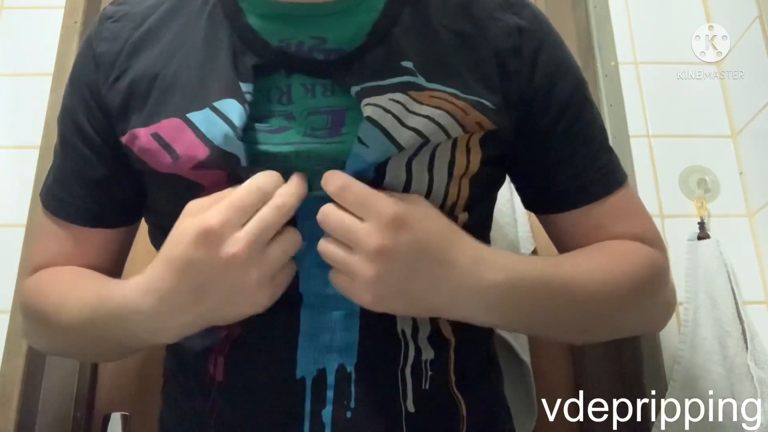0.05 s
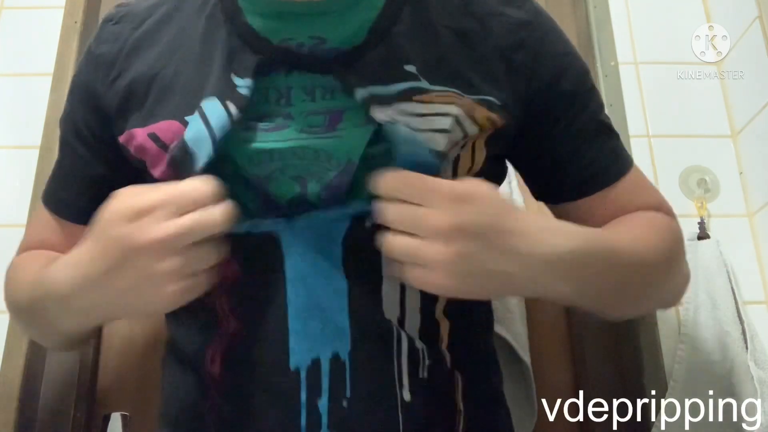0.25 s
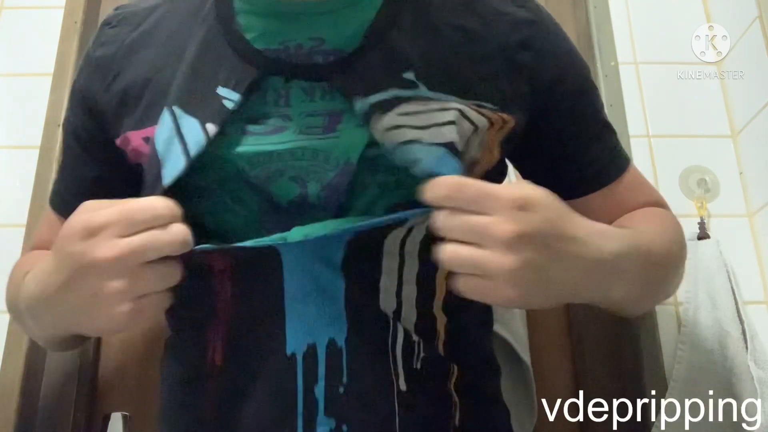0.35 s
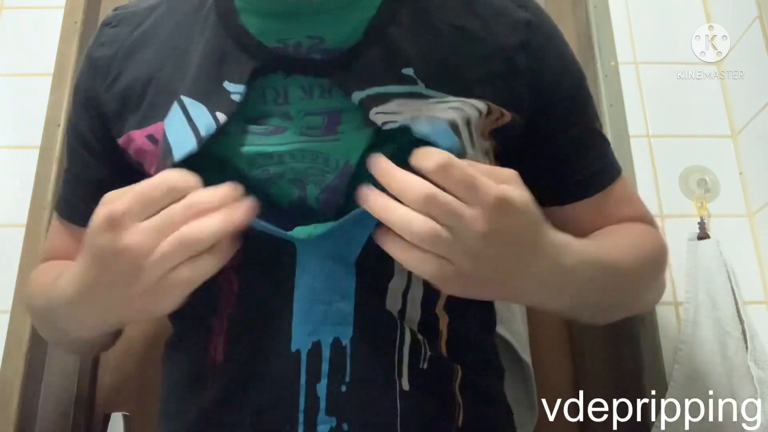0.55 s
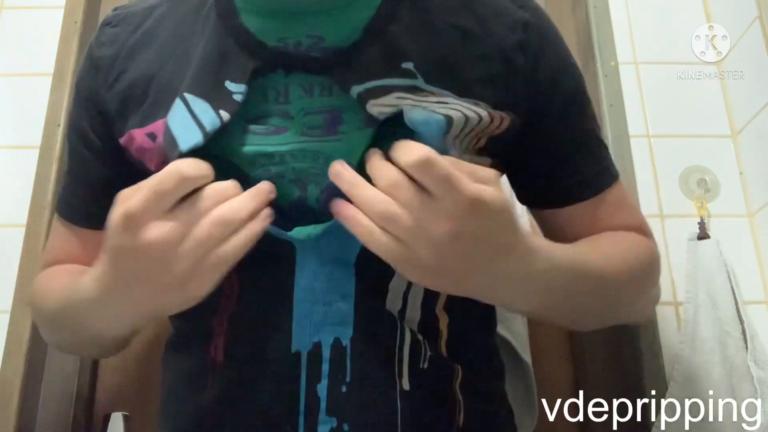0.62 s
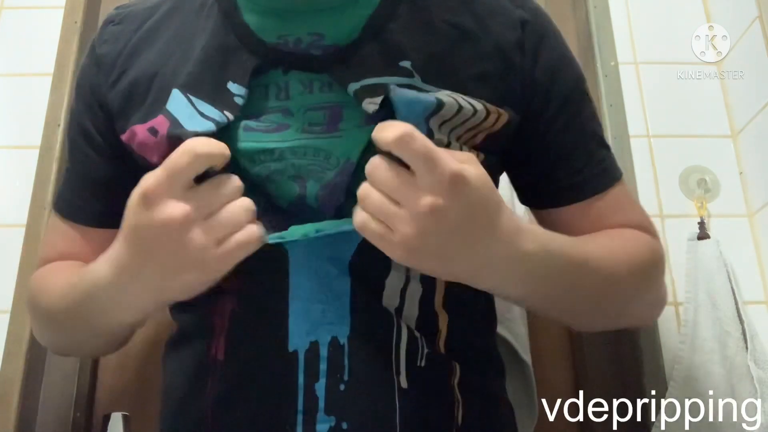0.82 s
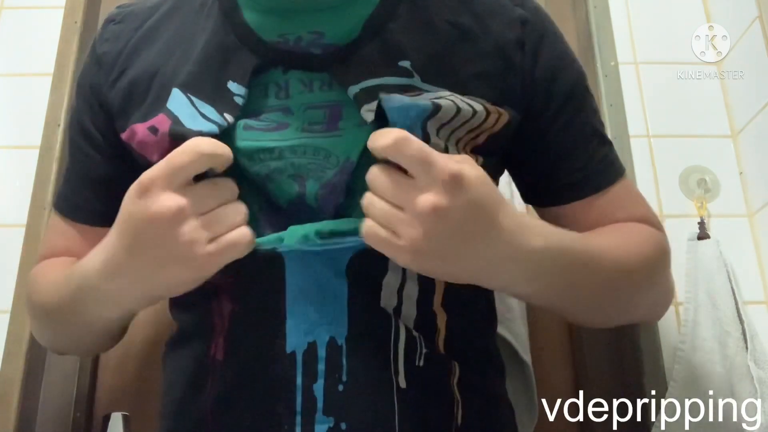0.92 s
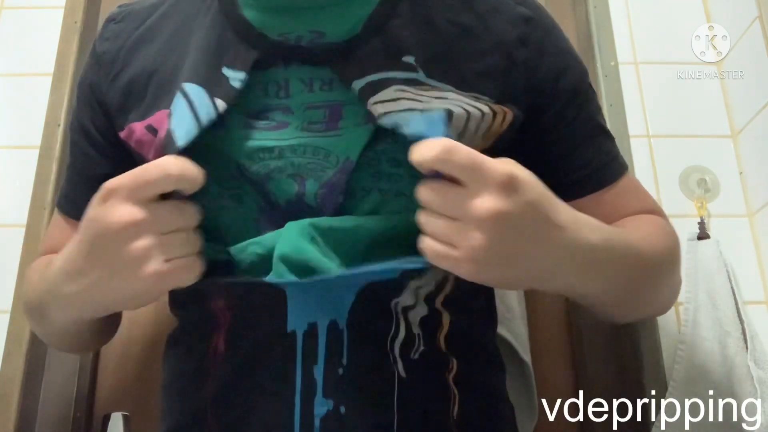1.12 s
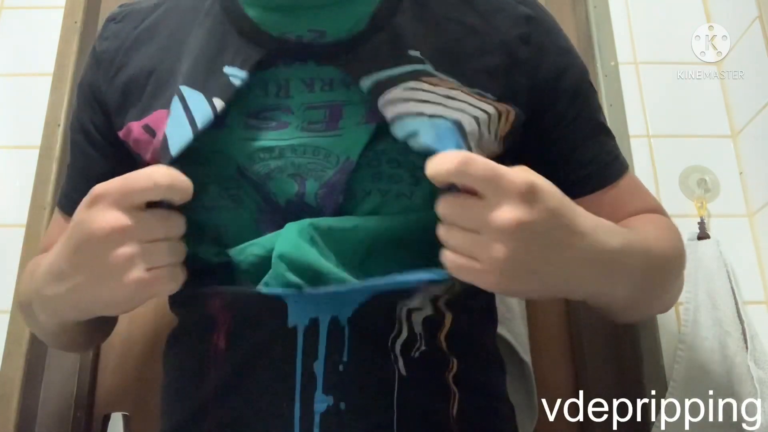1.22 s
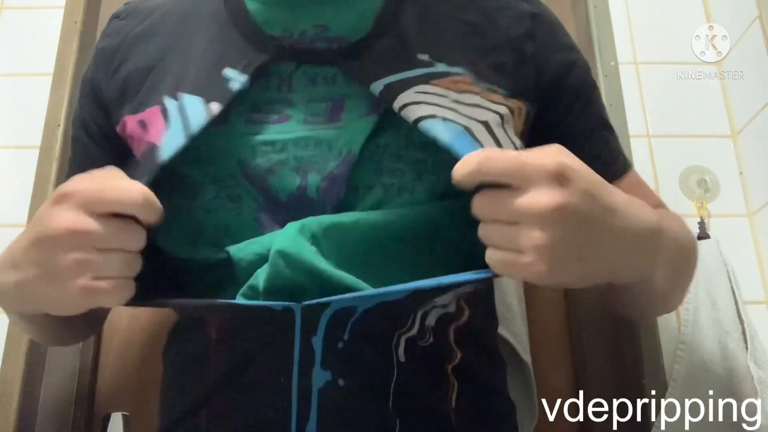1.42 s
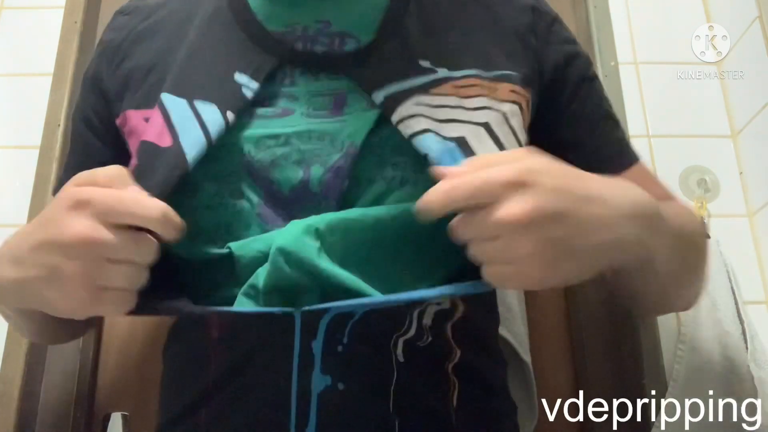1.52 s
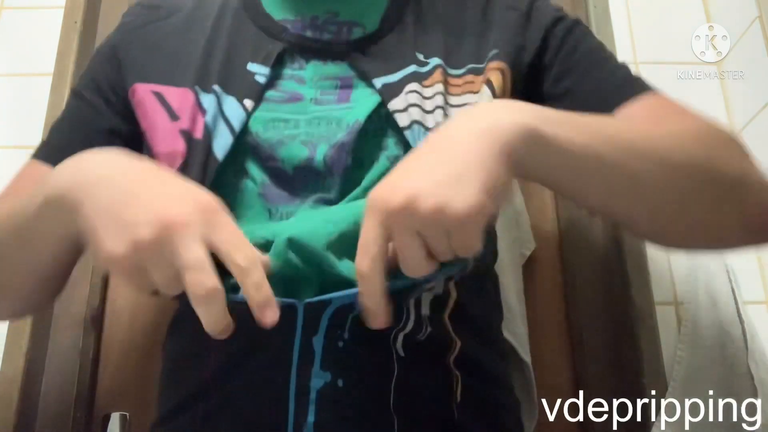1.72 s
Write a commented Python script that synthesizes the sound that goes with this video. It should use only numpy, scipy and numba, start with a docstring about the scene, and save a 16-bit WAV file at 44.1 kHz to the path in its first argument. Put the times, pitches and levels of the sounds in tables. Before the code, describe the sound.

A cotton shirt tears close to the microphone, with a harsh crackling rip from about 0.2 to 0.45 seconds. After a short lull, single threads snap around 1 second. Two more rips follow back to back, from 1.05 to 1.25 and from 1.3 to 1.5 seconds. The loose cloth then softly rustles and flaps until about 1.75 seconds. A small tiled room adds brief echo and a faint low hum.

```python
"""A small tiled room, a phone's two microphones close to a cotton shirt torn open by hand in three pulls.
Rows of stitches give way in quick uneven snaps, each with a spray of breaking fibres; the snaps ring
the taut cloth and, as the tear widens, shake the loose panels. The cloth rustles and flaps afterwards.
Chest, arms and tiles throw the sound back; behind it lie a low hum and faint room tone."""
import sys
import numpy as np
from scipy import signal
from scipy.fft import rfft, irfft
from scipy.io import wavfile
from scipy.ndimage import uniform_filter1d
from numba import njit

SR = 44100
rng = np.random.default_rng(int(sys.argv[2]) if len(sys.argv) > 2 else 0)


def wav_record(signal):
    """Record a signal, one row per channel, as 16-bit PCM in the file named by sys.argv[1]."""
    frames = np.transpose(np.atleast_2d(signal))
    bounded = np.clip(frames, -1, 1)
    # unit amplitude maps onto the largest positive 16-bit level
    quanta = np.round(bounded * 32767).astype(np.int16)
    wavfile.write(sys.argv[1], SR, quanta)


N = 77175

# course of each pull (time [s], snaps [dB], taut cloth [dB], loose panels [dB])
PULL_1 = [(.236, -36, -40, -65), (.26, -38, -38, -57.5), (0.287, -38, -36.5, -53), (0.298, -37.5, -40, -46),
          (.32, -36.5, -37, -48), (.35, -35.5, -34, -43), (0.371, -35.5, -30, -37.5),
          (0.387, -37, -38, -40), (0.409, -39, -28.5, -44.5), (.418, -37, -38.5, -45),
          (.428, -44, -32, -44.5), (0.439, -38, -41, -46.5)]
PULL_2 = [(1.046, -40.5, -46, -56), (1.07, -38, -44.5, -57), (1.105, -37.5, -43.5, -47),
          (1.145, -38.5, -43, -43), (1.195, -36.5, -48.5, -45), (1.228, -38.5, -40, -41),
          (1.249, -38.5, -38.5, -48), (1.259, -40.5, -43.5, -51)]
PULL_3 = [(1.292, -35, -38.5, -42), (1.305, -39.5, -39, -37), (1.335, -37, -45, -45.5),
          (1.362, -34, -39, -43), (1.41, -37, -37.5, -43.5), (1.458, -38, -41, -46)]
# taut cloth's resonances in each pull (frequency [Hz], width [Hz], level [dB])
TAUT_MODES_1 = [(678.5, 160, -5), (950, 50, 2.5), (1047, 120, -3.5), (1550, 170, -12.5), (2150, 640, -8.5)]
TAUT_MODES_2 = [(634, 100, -2.5), (964, 62, -1), (1074, 81, 1.5), (1480, 410, -13.5), (2126, 610, -10.5)]
TAUT_MODES_3 = [(612, 71, 2.5), (952, 43, 1.5), (1055, 56, -3.5), (1674, 180, -14), (2350, 230, -5.5)]
# loose panels' resonances in each pull (frequency [Hz], width [Hz], level [dB])
LOOSE_MODES_1 = [(192.7, 30, 2), (275, 60, 0), (363, 41, -3.5)]
LOOSE_MODES_2 = [(129.4, 24.4, 5), (203, 22, -9.5), (291, 88, -7)]
LOOSE_MODES_3 = [(131, 26, 0), (205, 34, -6), (277, 37, -3.5)]
# a ring that sags as the tear lengthens, per pull (start [Hz], end [Hz], width [Hz], level [dB])
RING_SAG = [(1118, 975, 50, -3), (1094, 1030, 100, -9), (1057, 1015, 60, -9.5)]
# stitch rows per pull (rate [1/s], scatter of strength [dB], top treble gain [dB])
STITCH_ROWS = [(299.8, 1.1, -0.5), (170, 2, -0.5), (140.03, 1.5, 4.5)]
# colour of a snap (frequency [Hz], level [dB])
SNAP_COLOUR = [(150, -27), (500, -0.5), (1500, 1), (2300, 3), (2900, 3), (4500, 2), (6500, 1), (7500, 1.5),
               (9300, 2), (12000, 1.5), (14500, -1.5), (16000, -0.5)]
# single threads breaking (time [s], level [dB], cloth ring relative to it [dB])
THREAD_BREAKS = [(0.2148, -40.5, 3), (0.222, -39, 4.5), (0.2336, -34.5, -7), (0.313, -31.5, -1),
                 (0.9812, -41, -3), (0.9982, -35.5, -4.5), (1.0074, -35.5, -2), (1.012, -35.5, -9),
                 (1.019, -36.5, -12.5), (1.033, -35.5, -9), (1.1933, -31, -11), (1.2903, -32.5, -18),
                 (1.2943, -27, -10.5), (1.3127, -33.5, -11)]
# cloth sliding over cloth, and air pushed by the flapping shirt (time [s], level [dB])
RUSTLE_LEVEL = [(0, -69.5), (.09, -71.5), (.105, -72), (.2, -62), (.55, -68.5), (.66, -81), (.95, -81),
                (1.1, -54), (1.48, -49.5), (1.56, -64), (1.6, -66), (1.64, -64), (1.75, -66.5)]
FLAP_LEVEL = [(0, -67.5), (.3, -73), (.45, -51), (.62, -81.5), (1, -69.5), (1.15, -56), (1.35, -54.5),
              (1.5, -46.5), (1.6, -54.5), (1.68, -50.5), (1.75, -51)]
# colours of rustle, flap and room tone (frequency [Hz], level [dB])
RUSTLE_COLOUR = [(60, 1), (140, 8), (300, -3), (550, -3.5), (1050, -6), (1350, -20), (4000, -23),
                 (14000, -42)]
FLAP_COLOUR = [(25, -33), (45, -1), (62, 3), (90, -9), (135, -14.5), (200, -21), (500, -47)]
ROOM_TONE_COLOUR = [(30, -1), (140, 0.5), (300, -10), (600, -22), (1500, -23), (5000, -27), (15000, -28.5)]
# decay of the tiled room (frequency [Hz], T60 [s])
ROOM_T60 = [(100, .5), (300, 0.39), (700, .24), (2000, 0.21), (7000, 0.21), (15000, 0.12)]
# diffuse sound at the two microphones (frequency [Hz], likeness [correlation, clipped to +-0.99])
MIC_LIKENESS = [(60, -0.05), (150, 0.8), (300, 0), (700, 0.47), (1400, -0.55), (5000, 0.47), (7000, 0.8),
                (8500, 2.53), (9800, 5.1), (11200, 2.5), (12800, 2.2)]
# phase between the microphones (frequency [Hz], left lead [rad])
MIC_PHASE = [(60, 0.5), (1000, -.5), (2200, -1.22), (4000, -1.85), (7000, -1.73), (8300, -3), (9800, -4),
             (10700, -4.5), (12000, -5), (13000, -5.5), (16000, -5.5)]
# balance of the microphones (frequency [Hz], left over right [dB])
MIC_BALANCE = [(50, -5), (110, -3.5), (200, 1.5), (300, 4.5), (700, -1.5), (1100, 4), (2400, 0), (4400, 2),
               (9000, -0.5)]

SNAP_TRIM_DB, TAUT_TRIM_DB, LOOSE_TRIM_DB = 1, -3, -0.5
ATTACK_S, RELEASE_S, UNEVENNESS, TOP_TREBLE_HZ = 0.00305, .008, .45, 11500
SPRAY_S, SPRAY_DB, FIBRES_PER_S, FRAY_DB = 0.0022, 3.5, 9000, -6
THREAD_S, THUD_DB = 0.0028, -15
BODY_T60_S, BODY_FROM_HZ = .03, 1230
ROOM_DB, FIRST_ECHO_S, ROOM_TONE_DB = -0.5, .003, -71.5
HUM_HZ, HUM_DB, HUM_WAVER_DB, HUM_DRIFT = 49.5, -54, -0.6, .012


def tear(course, sag, taut_modes, loose_modes, stitch_rows, rows=400):
    """One pull, close up: stitch rows snap in turn and excite the taut and the loose cloth."""
    t = seconds()
    when, snap_db, taut_db, loose_db = np.array(course).T
    rate, scatter_db, top_db = stitch_rows
    start_hz, end_hz, width_hz, sag_db = sag
    gap, strength = rng.standard_normal((rows, 2)).T
    held = np.exp(UNEVENNESS * gap)  # a row that holds longer snaps harder
    times = when[0] + (np.cumsum(held) - held[0]) / rate
    sizes = np.sqrt(held) * undb(scatter_db * strength) * rng.choice([-1, 1], rows)
    sizes *= np.sqrt(SR / rate / np.mean(sizes ** 2))
    attack = np.clip((t - when[0]) / ATTACK_S + 1, 0, 1)
    release = np.exp(-np.maximum(t - when[-1], 0) / RELEASE_S)
    force = attack * release * (snaps(times, sizes) + undb(FRAY_DB) * fibres())
    drive = lambda db: force * undb(np.interp(t, when, db))
    shelf_db = top_db / (1 + (TOP_TREBLE_HZ / bins()) ** 10)
    crackle = through(drive(snap_db + SNAP_TRIM_DB), causal(undb(per_hz(SNAP_COLOUR) + shelf_db)))
    taut = through(drive(taut_db + TAUT_TRIM_DB), resonances(taut_modes))
    loose = through(drive(loose_db + LOOSE_TRIM_DB), resonances(loose_modes))
    ring_hz = np.interp(t, when[[0, -1]], [start_hz, end_hz])
    ring = sagging_ring(drive(taut_db + sag_db), ring_hz, float(width_hz))
    return crackle + taut + loose + ring


def snaps(times, sizes):
    """Each snap is a click followed by a short spray of breaking fibres."""
    clicks = np.zeros(N)
    np.add.at(clicks, np.clip((times * SR).astype(int), 0, N - 1), sizes)
    pole = np.exp(-1 / (SPRAY_S * SR))
    spray = np.sqrt(signal.lfilter([1 - pole], [1, -pole], clicks ** 2)) * fibres()
    return (clicks + undb(SPRAY_DB) * spray) / np.hypot(1, undb(SPRAY_DB))


def fibres():
    """Dense tiny clicks of single fibres, at unit level."""
    chance = FIBRES_PER_S / SR
    return rng.choice([-1, 1], N) * (rng.random(N) < chance) / np.sqrt(chance)


@njit
def sagging_ring(force, hz, width_hz):
    """The taut cloth's gliding ring: a state-variable band-pass that keeps white noise's level."""
    ring = np.empty(len(force))
    band_state, low_state = 0., 0.
    for i in range(len(force)):
        tuning, damping = np.tan(np.pi * hz[i] / SR), width_hz / hz[i]
        band = (band_state + tuning * (force[i] - low_state)) / (1 + tuning * (tuning + damping))
        band_state = 2 * band - band_state
        low_state += 2 * tuning * band
        ring[i] = damping * band
    return ring * np.sqrt(SR / (np.pi * width_hz))


def threads():
    """Single strong threads break under load, ringing the taut cloth and shaking the loose panels."""
    when, db, ring_db = np.array(THREAD_BREAKS).T
    crack = through(snaps(when, undb(db)), causal(undb(per_hz(SNAP_COLOUR))))
    ring = through(snaps(when, undb(db + ring_db)), resonances(TAUT_MODES_2))
    thud = through(snaps(when, undb(db + THUD_DB)), resonances(LOOSE_MODES_1))
    return (crack + ring + thud) * np.sqrt(THREAD_S * SR)


def rustle_and_flap():
    """The shirt slides over the one beneath and pushes air as it flaps free."""
    return noise(RUSTLE_COLOUR) * envelope(RUSTLE_LEVEL) + noise(FLAP_COLOUR) * envelope(FLAP_LEVEL)


def body_reflections(shirt, places=24, taps=2048):
    """Quick treble echoes off chest and arms, different at each microphone and as the hands move."""
    treble = through(shirt, 1 / (1 + BODY_FROM_HZ / (1j * bins())) ** 2)
    decay = np.exp(-np.log(1000) * seconds()[:taps] / BODY_T60_S)
    decay /= np.sqrt(np.sum(decay ** 2))
    echoes = diffuse(*rng.standard_normal((2, N)))
    place = np.linspace(0, places - 1, N)
    reflected = np.zeros((2, N + taps))
    for k in range(places):
        here = np.flatnonzero(np.abs(place - k) < 1)
        crossfaded = treble[here] * np.cos(np.pi / 2 * (place[here] - k))
        response = echoes[:, k * taps:(k + 1) * taps] * decay
        reflected[:, here[0]:here[-1] + taps] += signal.fftconvolve(crossfaded[None], response, axes=1)
    return reflected[:, :N]


def tiled_room(shirt):
    """Dense reflections off the tiled walls; the bass lasts longest."""
    age = np.maximum(seconds() - FIRST_ECHO_S, 0)
    echoes = rng.standard_normal((2, N))
    tail = 0
    for band_hz, t60 in ROOM_T60:
        band = per_hz([(hz, hz == band_hz) for hz, _ in ROOM_T60])
        decay = np.exp(-np.log(1000) * age / t60) * (age > 0)
        tail += through(echoes, band) * decay / np.sqrt(np.sum(decay ** 2))
    return through(shirt, rfft(diffuse(*tail), 2 * N))


def hum():
    """A low background hum, wavering slightly in pitch and level."""
    phase = 2 * np.pi * np.cumsum(HUM_HZ * (1 + HUM_DRIFT * wander(rate_hz=12))) / SR
    return np.sqrt(2) * np.sin(phase) * undb(HUM_DB + HUM_WAVER_DB * wander(rate_hz=13))


def room_tone():
    """Faint, dull noise from all round the microphones."""
    return undb(ROOM_TONE_DB) * diffuse(noise(ROOM_TONE_COLOUR), noise(ROOM_TONE_COLOUR))


def diffuse(a, b):
    """Mix two unrelated signals into a partly alike left and right."""
    alike = np.clip(per_hz(MIC_LIKENESS), -.99, .99)
    mid = through(a, np.sqrt((1 + alike) / 2))
    side = through(b, np.sqrt((1 - alike) / 2))
    return np.array([mid + side, mid - side])


def resonances(modes):
    """Response of damped resonances with steep skirts."""
    f, power = bins(), 0
    for hz, width_hz, db in modes:
        detuning = (f / hz - hz / f) * hz / width_hz
        power += undb(db) ** 2 / (1 + detuning ** 2 / 2) ** 2
    return causal(np.sqrt(power))


def causal(gain):
    """Minimum-phase response with the given gains, at unit level."""
    cepstrum = irfft(np.log(unit(gain) + 1e-6))
    cepstrum[1:N] *= 2
    cepstrum[N + 1:] = 0
    return np.exp(rfft(cepstrum))


def noise(colour):
    """Coloured noise at unit level."""
    return through(rng.standard_normal(N), unit(undb(per_hz(colour))))


def wander(rate_hz):
    """Slow random wandering, spread near 1."""
    step = int(SR / rate_hz)
    return uniform_filter1d(np.repeat(rng.standard_normal(N // step + 1), step), step)[:N]


def envelope(points):
    """Gain along (time [s], level [dB]) points."""
    return undb(np.interp(seconds(), *np.array(points).T))


def per_hz(points):
    """Join (frequency [Hz], value) points on a log-frequency axis."""
    hz, value = np.array(points, float).T
    return np.interp(np.log(bins()), np.log(hz), value)


def through(x, response):
    """Filter by a frequency response."""
    return irfft(rfft(x, 2 * N) * response)[..., :N]


def unit(response):
    """Scale a response so that white noise keeps its level."""
    return response / np.sqrt(np.mean(np.abs(response) ** 2))


def undb(db):
    """Decibels to gain."""
    return 10 ** (np.asarray(db) / 20)


def seconds():
    """Time of every sample."""
    return np.arange(N) / SR


def bins():
    """Frequencies of a spectrum padded to twice the length."""
    return np.maximum(np.arange(N + 1) * SR / (2 * N), 1)


def scene():
    """The shirt close up, its reflections around it, hum and room tone behind."""
    pulls = zip((PULL_1, PULL_2, PULL_3), RING_SAG, (TAUT_MODES_1, TAUT_MODES_2, TAUT_MODES_3),
                (LOOSE_MODES_1, LOOSE_MODES_2, LOOSE_MODES_3), STITCH_ROWS)
    shirt = sum(tear(*pull) for pull in pulls) + threads() + rustle_and_flap()
    in_room = shirt + body_reflections(shirt) + undb(ROOM_DB) * tiled_room(shirt)
    return in_room / np.hypot(1, undb(ROOM_DB)) + hum() + room_tone()


def record(dry):
    """The phone's two microphones differ in phase and level; the top is cut steeply."""
    left = undb(per_hz(MIC_BALANCE) / 2) * np.exp(1j * per_hz(MIC_PHASE) / 2)
    mics = through(dry, np.array([left, 1 / left]))
    top_cut = signal.ellip(10, .2, 80, 15900, fs=SR, output="sos")
    return signal.sosfilt(top_cut, mics)


dry = scene()
out = record(dry)
wav_record(out)
```